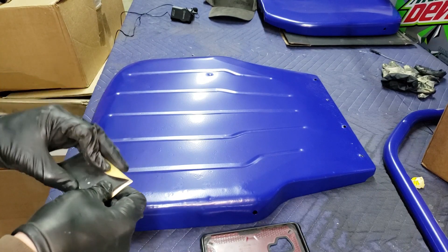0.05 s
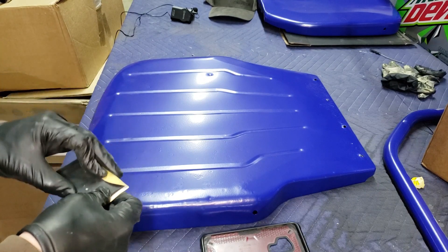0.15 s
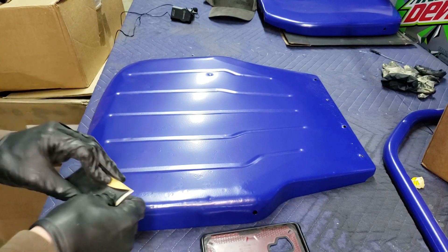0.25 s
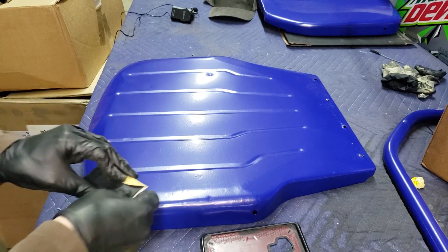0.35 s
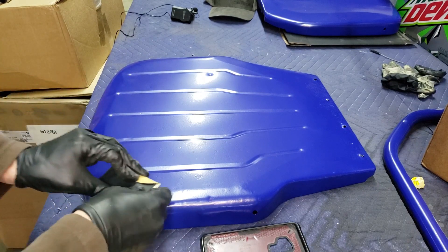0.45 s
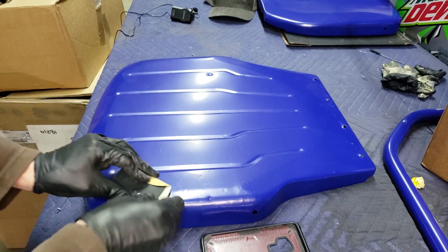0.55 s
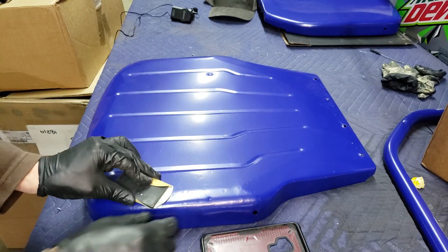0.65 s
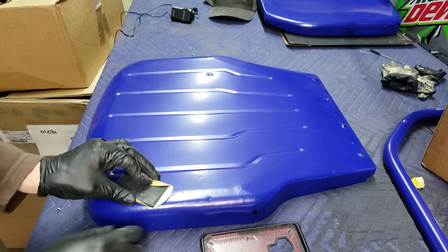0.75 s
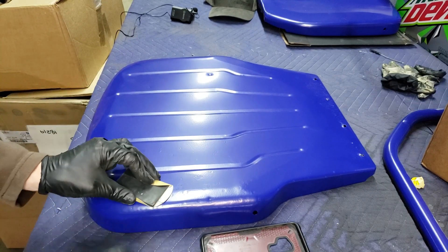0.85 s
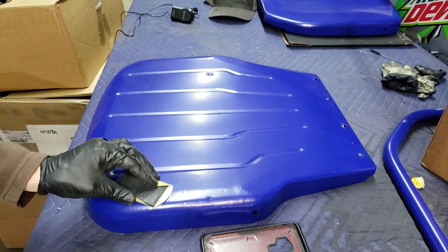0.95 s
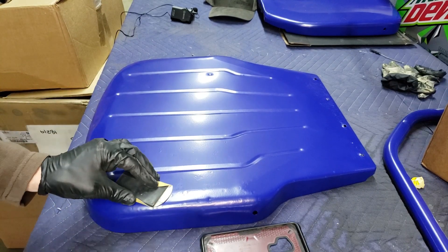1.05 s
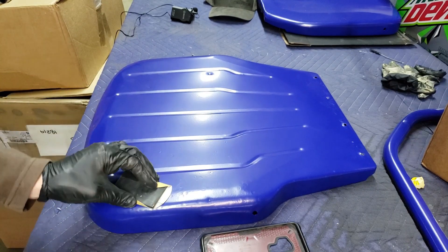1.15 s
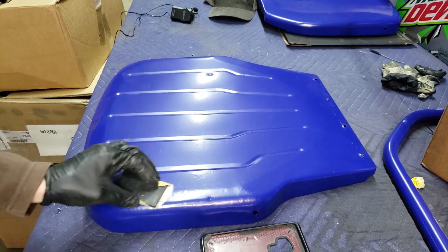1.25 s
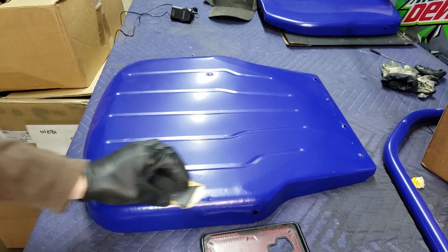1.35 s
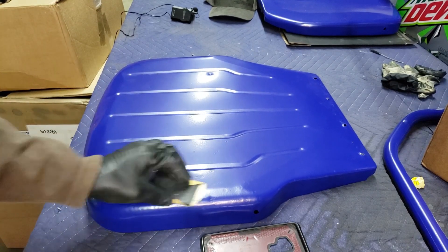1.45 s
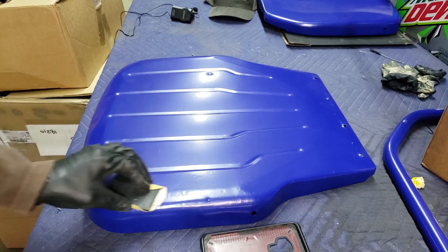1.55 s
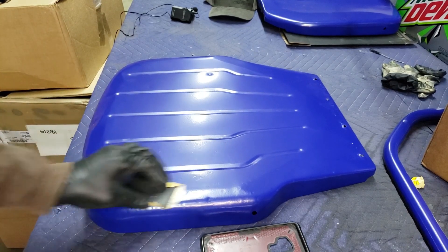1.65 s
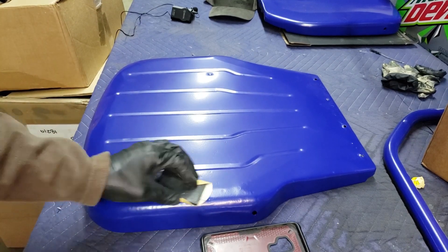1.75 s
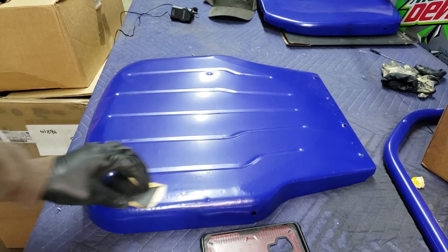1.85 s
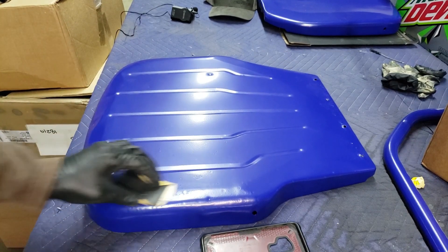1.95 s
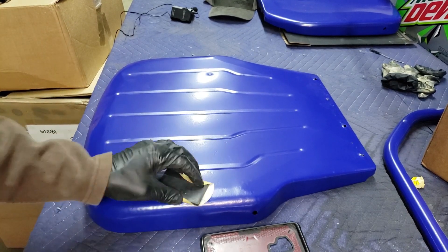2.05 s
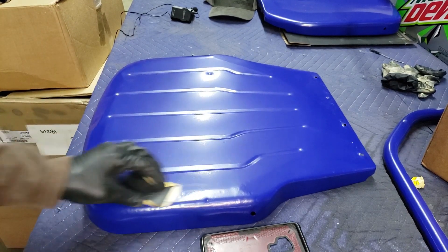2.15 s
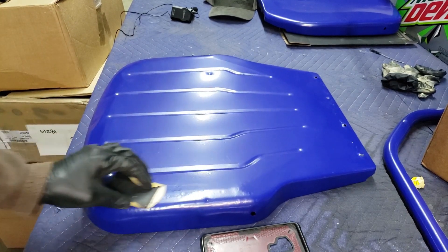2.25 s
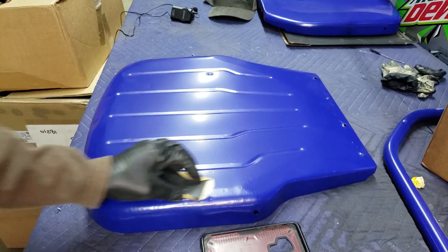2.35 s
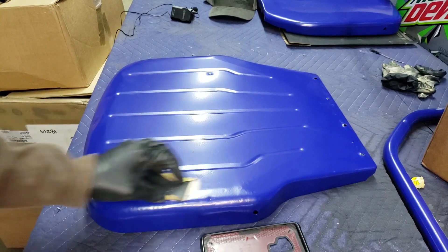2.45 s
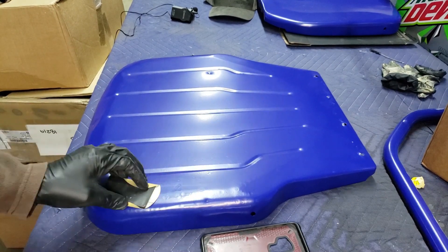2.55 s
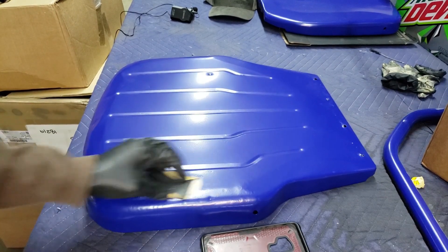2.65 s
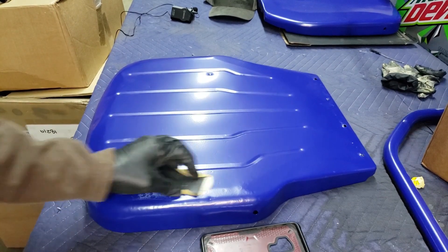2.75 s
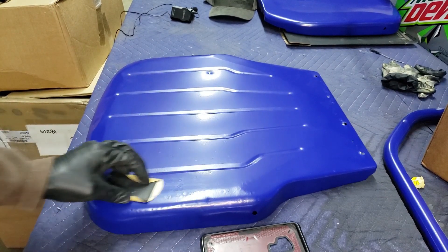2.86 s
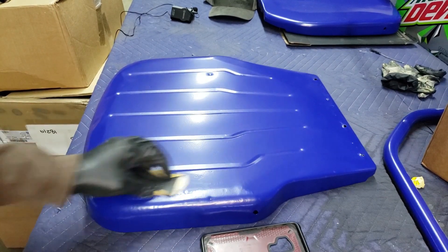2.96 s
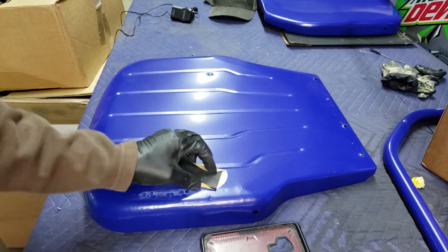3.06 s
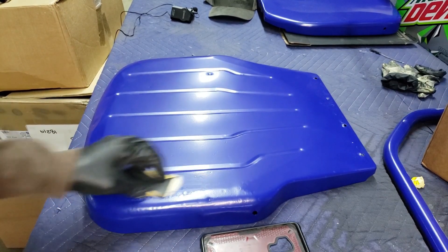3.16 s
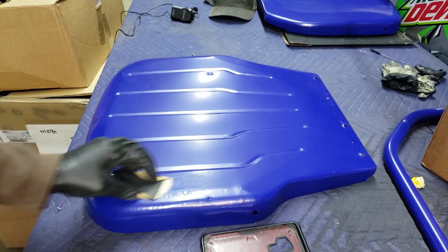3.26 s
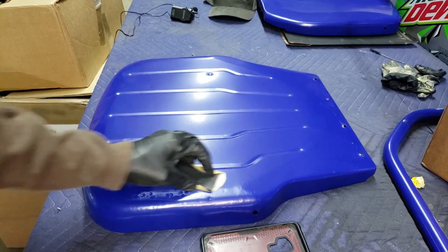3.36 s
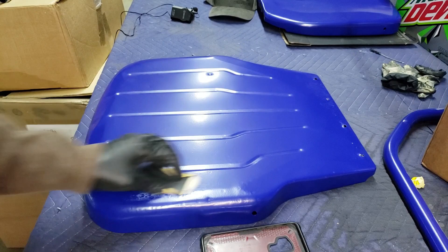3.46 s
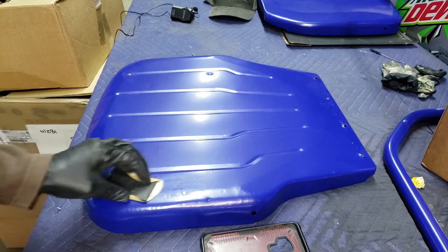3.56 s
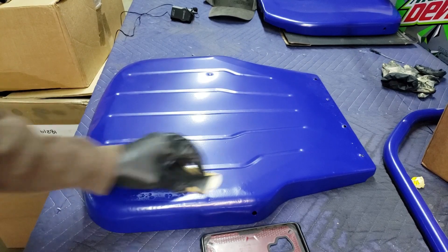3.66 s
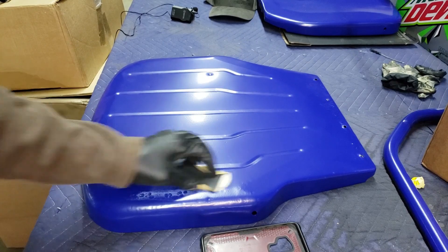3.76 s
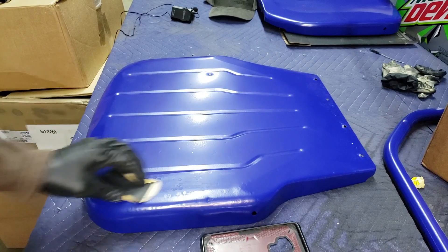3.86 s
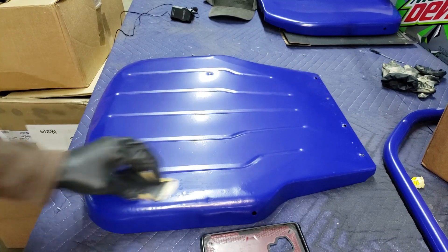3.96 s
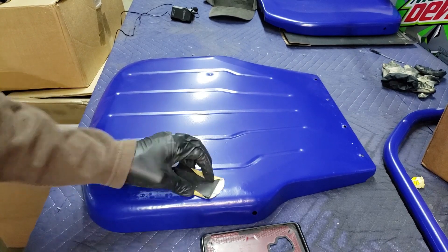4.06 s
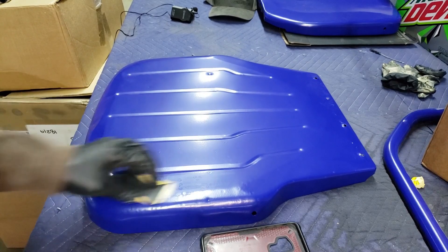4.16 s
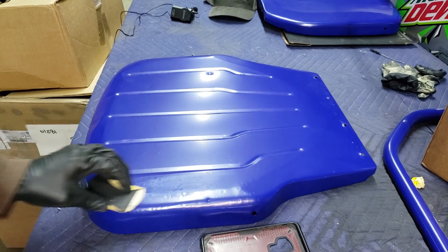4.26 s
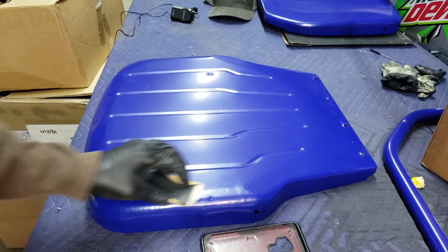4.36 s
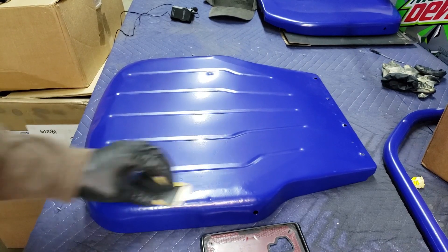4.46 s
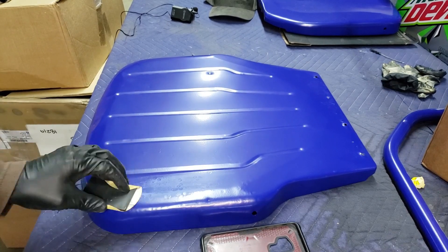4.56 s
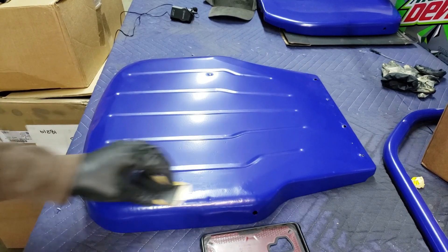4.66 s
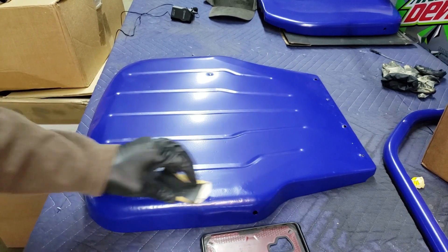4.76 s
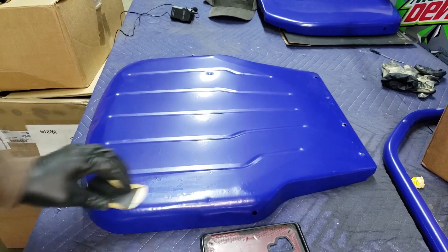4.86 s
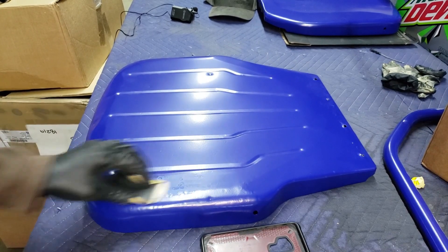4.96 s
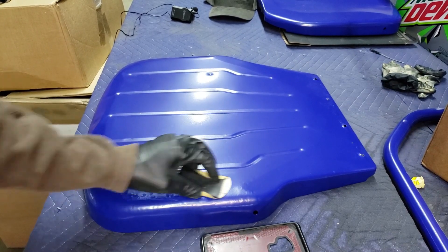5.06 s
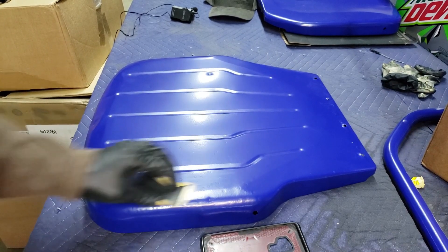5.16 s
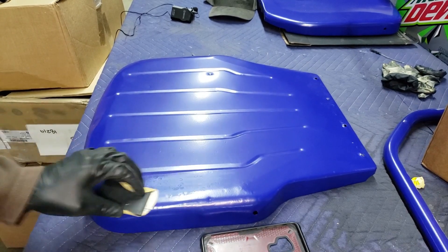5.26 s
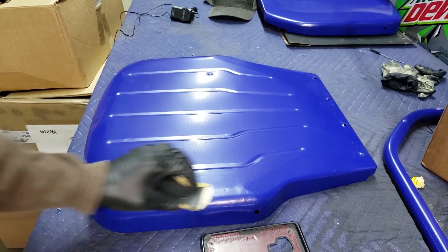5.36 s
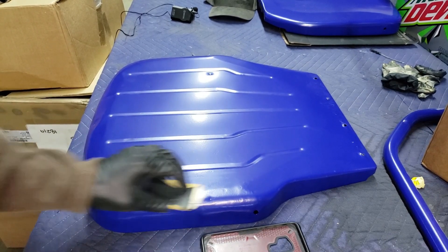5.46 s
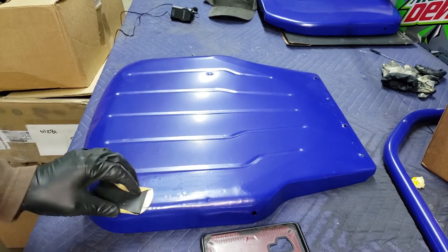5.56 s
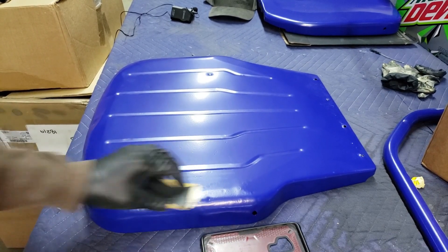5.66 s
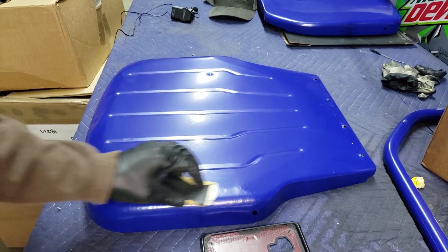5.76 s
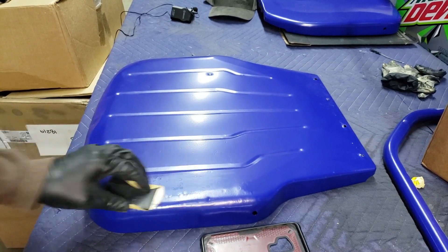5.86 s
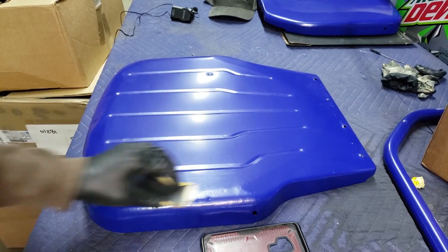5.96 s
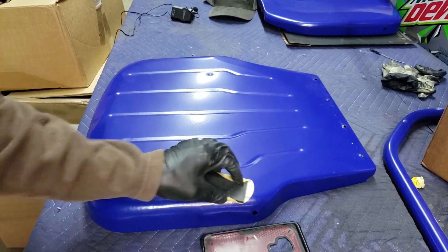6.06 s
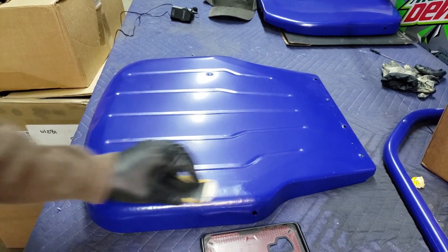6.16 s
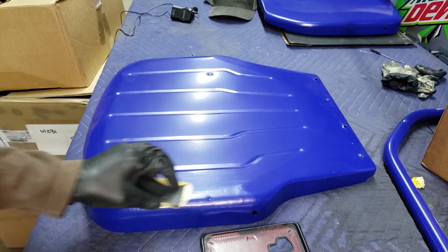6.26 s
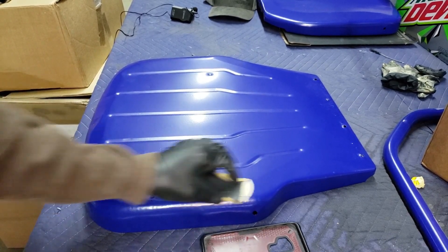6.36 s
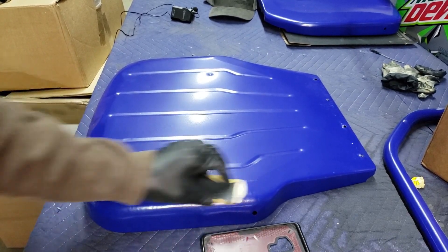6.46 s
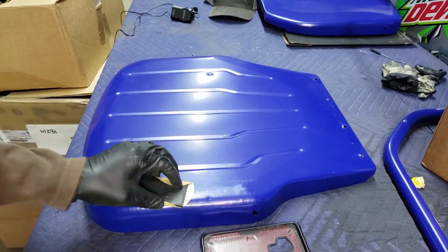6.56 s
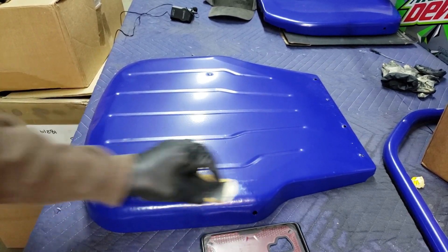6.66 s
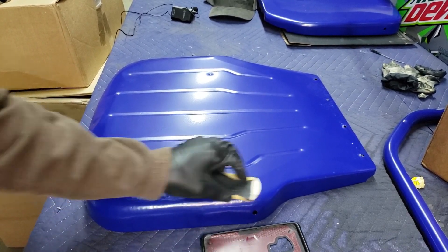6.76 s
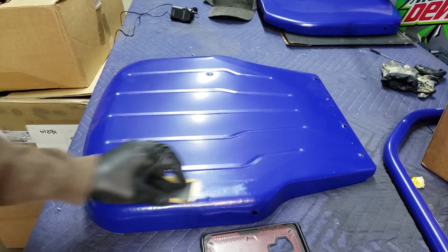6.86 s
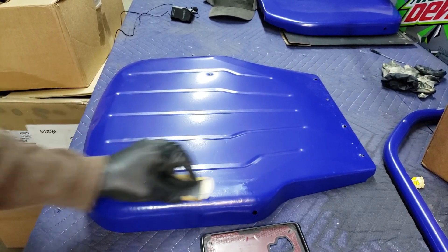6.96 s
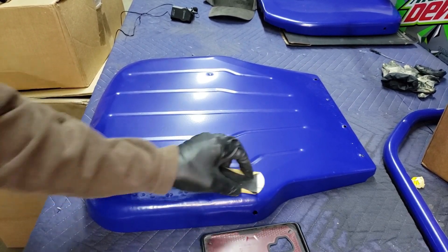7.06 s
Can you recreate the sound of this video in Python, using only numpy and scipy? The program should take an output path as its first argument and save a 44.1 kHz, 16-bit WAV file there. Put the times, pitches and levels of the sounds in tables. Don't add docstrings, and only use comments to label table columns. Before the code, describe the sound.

Gloved hands rustle and snap folded sandpaper, then rub it briskly back and forth on painted sheet steel in a humming workshop.

```python
import sys
import numpy as np
from scipy import signal
from scipy.fft import rfft, irfft
from scipy.io import wavfile
from scipy.ndimage import uniform_filter1d

SR = 44100
rng = np.random.default_rng(int(sys.argv[2]) if len(sys.argv) > 2 else 0)


def ratio_of_db(decibels):
    return 10 ** (np.asarray(decibels, float) / 20)


def materialize(psi):
    bounded = np.clip(np.atleast_2d(psi).T, -1, 1)
    quanta = np.round(bounded * 32767).astype(np.int16)
    wavfile.write(sys.argv[1], SR, quanta)


N = 313110


# [pad breaks free t/s, grit level/dB, fastest point 0-1, stuck at
# next turn t/s]
SANDING_STROKES = [(1.327, -40, 0.6, 0.042), (1.673, -38, 0.67, 0.034), (1.983, -38.0, 0.5, 0.026),
                   (2.311, -38.5, 0.55, 0.026), (2.643, -38, 0.8, 0.035), (2.97, -38.5, 0.35, 0.019),
                   (3.299, -39.5, 0.43, 0.017), (3.622, -38.5, 0.37, 0.022), (3.973, -38, 0.54, 0.02),
                   (4.315, -37, 0.64, 0.034), (4.641, -38.5, 0.52, 0.02), (4.974, -37.5, 0.42, 0.018),
                   (5.322, -40.5, 0.34, 0.018), (5.639, -38.5, 0.52, 0.021), (5.96, -38.5, 0.56, 0.025),
                   (6.309, -39, 0.66, 0.027), (6.643, -39.0, 0.6, 0.026), (6.978, -38, 0.2, 0.016),
                   (1.501, -39, 0.52, 0.033), (1.826, -37.5, 0.18, 0.026), (2.146, -38.5, 0.26, 0.029),
                (2.475, -37.0, 0.26, 0.03), (2.804, -38, 0.31, 0.022), (3.134, -40.5, 0.55, 0.022),
                (3.463, -40, 0.5, 0.023), (3.8, -39.5, 0.63, 0.021), (4.141, -36.5, 0.43, 0.032),
                (4.481, -37.5, 0.34, 0.032), (4.807, -37.5, 0.4, 0.026), (5.153, -37, 0.43, 0.025),
                (5.481, -37.5, 0.58, 0.025), (5.807, -39.0, 0.66, 0.029), (6.148, -38.5, 0.5, 0.027),
                (6.483, -40.5, 0.44, 0.023), (6.814, -36, 0.44, 0.027)]


def strokes():
    return np.transpose(sorted(SANDING_STROKES))


def hand(rise, fall, jolt, late_s, trail_s):
    last_turn_s = 7.16
    start, _, fastest, stuck = strokes()
    next_turn = np.r_[start[1:] + late_s, last_turn_s]
    start = start + late_s
    end = next_turn - stuck + trail_s
    t = np.arange(N) / SR
    k = np.clip(np.searchsorted(start, t) - 1, 0, len(start) - 1)
    way = np.clip((t - start[k]) / (end - start)[k], 0, 1)
    speeding = np.sin(np.pi / 2 * np.clip(way / fastest[k], 0, 1)) ** rise
    up = jolt + (1 - jolt) * speeding
    down = np.sin(np.pi / 2 * np.clip((1 - way) / (1 - fastest[k]), 0, 1)) ** fall
    return uniform_filter1d(up * down * (way > 0), size=260), k


# [f/Hz, left minus right level/dB]
GRIT_BALANCE = [(700, -1), (1300, 1.5), (2400, 2), (4400, 2), (6500, -1), (9000, 10), (12000, 2),
                (15000, 11)]


def sanding():
    tear = tearing()
    grit = paper_colour(tear)
    tips_speed, k = hand(0.5, 0.64, 0.27, 0.0016, 0.0084)
    sheet_speed, _ = hand(0.52, 0.68, 0.14, -0.006, 0.026)
    tips = tips_speed * patchy(grit, [8000, 10400, 14200, 18960], 1.0, 17) * ratio_of_db(6.5)
    strokes_sound = tips + pad(tear, grit, k) + panel(tear, grit, sheet_speed, k)
    grit_db = strokes()[1]
    work = ratio_of_db(grit_db[k]) * strokes_sound + flexing(sheet_speed) + chips()
    return irfft(rfft(work) * sides(on_log(GRIT_BALANCE, work)), N)


def tearing():
    luck = np.minimum(rng.exponential(size=N // 6 + 1), 4.5)
    size = np.repeat(ratio_of_db(1.6 * luck), 6)[:N]
    size = size * ratio_of_db(1.0 * walk(120) + 0.76 * walk(25))
    low = band(pair(0.33, lag=-6) * size, 100, 8200)
    high = band(pair(0.1, lag=-6) * size, 8200, 21000)
    return unit(low + high)


def effort():
    start, grit_db = strokes()[:2]
    usual_db = -39
    return start - start[0], grit_db - usual_db


def pad(tear, grit, k):
    worn_s, extra_db = effort()
    effort_share = 0.83
    level_db = (-5 - (1 - effort_share) * extra_db)[k]
    speed, _ = hand(1.0, 0.73, 0.42, 0.00033, 0.017)
    paper = patchy(grit, [4314, 4850, 6370, 7350, 8420], 1.83, 12) * ratio_of_db(5.0 + level_db)
    fold_db, fade_db_per_s = -6, 2.9
    fold = ring(tear, 6490, 780) * ratio_of_db(2.5 + level_db + fold_db - fade_db_per_s * worn_s[k])
    return speed * (paper + fold)


# [f/Hz, width f/Hz, level/dB]
PANEL_MODES = [(1136, 18, -12), (1250, 22, -8), (1465, 25, -6), (1781, 16, -4), (2013, 18, -6),
               (2186, 14, -2), (2318, 14, -9), (3035, 12, -1)]


def panel(tear, grit, speed, k):
    worn_s, extra_db = effort()
    effort_share, clog_db_per_s = 0.37, 0.5
    level_db = -8.5 - (1 - effort_share) * extra_db - clog_db_per_s * worn_s
    settle_db, settle_s = -2.5, 0.12
    level_db = level_db + settle_db * np.exp(-worn_s / settle_s)
    modes = sum(ratio_of_db(db + 2.5 * walk(8)) * ring(tear * speed, hz, width) for hz, width, db in PANEL_MODES)
    scrape = speed * patchy(grit, [800, 1500, 2300, 3300, 4500], 1.4, 16)
    return (scrape + ratio_of_db(-14) * unit(modes)) * ratio_of_db(3.0 + level_db[k])


def flexing(speed):
    return speed * unit(band(pair(0.89), 180, 824)) * ratio_of_db(-60.0 + 2 * walk(3.9))


# [t/s, peak level/dB]
LOOSE_GRAINS = [(1.527, -14), (1.568, -8), (1.7429, -16), (1.859, -8), (2.0546, -19), (2.0987, -15),
                (2.181, -6), (2.202, -2), (2.5556, -15), (2.7176, -28), (2.8734, -20), (3.3189, -19),
                (3.714, -21), (4.021, -2), (4.046, -18), (4.0615, -22), (4.2107, -4), (4.22, -6),
                (4.2327, -11), (4.355, -24), (4.3648, -17), (4.5144, -18), (4.8628, -11), (4.882, -2),
                (5.225, -8), (5.7309, -16), (5.85, 0), (6.0029, -15), (6.058, -18), (6.9127, -18)]


def chips():
    ticks = np.sign(pair(0.4, lag=-6)) * clicks(np.array(LOOSE_GRAINS), 0.0004) * ratio_of_db(-15.5)
    return paper_colour(band(ticks, 2400, 20000))


# [f/Hz, level/dB per Hz]
GRIT_SPECTRUM = [(900, -14.5), (1600, -8.5), (2200, -5.5), (3100, -2.5), (3500, -4), (5400, -1.5),
                 (6500, 0), (7500, -2), (8300, -11.5), (10000, -6), (12200, 1.5), (14000, -1.5), (15500, 0)]


def paper_colour(x):
    return colour(x, GRIT_SPECTRUM)


def handling():
    scuff = paper_colour(pair(0.32, lag=-4.5))
    lows = unit(band(scuff, 1400, 4340))
    mids = unit(band(scuff, 4300, 8900))
    tops = unit(band(scuff, 8000, 18000))
    return (rustling(lows, mids, tops) + snapping(mids, tops)) * sides(3.1)[:, None]


# [t/s, length t/s, level/dB, top minus rustle level/dB, lows minus rustle level/dB]
GLOVE_SCUFFS = [(0.0, 0.05, -78, -6, -3), (0.048, 0.09, -65.5, -5, -0.5), (0.225, 0.031, -64, -18, 2.5),
                (0.543, 0.06, -63, -12, 0), (0.579, 0.057, -56, -2, 0), (0.639, 0.066, -58, -2.5, 1.5),
                (0.704, 0.14, -67, -3, 3.5), (0.845, 0.016, -60, -3, -9), (0.855, 0.16, -73, -1, 4),
                (0.999, 0.022, -57, -4, -14), (1.011, 0.12, -62, -3, 6), (1.135, 0.074, -66.5, -16, 5),
                (1.19, 0.1, -58.5, -5.5, -0.5), (1.312, 0.03, -58, -2, -10)]


def rustling(lows, mids, tops):
    t = np.arange(N) / SR
    fastest, bluntness = 0.36, 0.65
    rustle = 0
    for start, length, db, top_db, low_db in GLOVE_SCUFFS:
        way = np.clip((t - start) / length, 0, 1)
        speed = np.minimum(way / fastest, (1 - way) / (1 - fastest))
        slide = np.sin(np.pi / 2 * speed) ** bluntness
        tone = mids + tops * ratio_of_db(top_db) + lows * ratio_of_db(low_db - 3.5)
        rustle = rustle + ratio_of_db(db) * slide * tone
    return rustle * ratio_of_db(2.0 * walk(150) + 1.1 * walk(500) + 3.5)


# [t/s, peak level/dB, mids minus peak level/dB]
CREASE_SNAPS = [(0.0897, -54, -4), (0.117, -49, 1), (0.2184, -57, -15), (0.2294, -57, -13),
                (0.5721, -54, -17), (0.6444, -41, -17), (0.66, -35, -7), (0.7374, -47, -14),
                (0.765, -45, -10), (0.7744, -43, -10), (0.7896, -42, -14), (0.8134, -32, -11),
                (0.848, -39, -16), (0.8889, -50, -10), (0.899, -46, -5), (0.9644, -48, -9),
                (1.006, -32, -12), (1.0154, -51, -11), (1.211, -39, -8), (1.2244, -45, -12),
                (1.2424, -44, -11), (1.2694, -51, -11)]


def snapping(mids, tops):
    snaps = np.array(CREASE_SNAPS)
    start, peak_db, mids_db = snaps.T
    bright = clicks(snaps, 0.0017) * np.sign(tops) * ratio_of_db(-9.5)
    dull = clicks(np.c_[start, peak_db + mids_db], 0.0022) * mids
    return bright + dull


def room(x):
    t60_s, level_db = 0.37, -9.5
    t = np.arange(SR // 2) / SR
    air = rng.standard_normal((2, len(t))) * (t > 0.004)
    low = band(air, 340, 4280) * ratio_of_db(-60 * t / t60_s)
    high = band(air, 3140, 25000) * ratio_of_db(-60 * t / (0.52 * t60_s))
    tail = unit(low + 0.45 * high) / np.sqrt(len(t))
    return ratio_of_db(level_db) * signal.fftconvolve(x, tail, axes=1)[:, :N]


# [f/Hz, level/dB, left minus right level/dB]
FAN_LINES = [(41.4, -57.5, 2), (82.8, -50.5, 1), (146.25, -48.5, -1)]


def fan():
    t = np.arange(N) / SR
    hum = 0
    for hz, db, pan_db in FAN_LINES:
        level = ratio_of_db(db + 1.5 + 0.11 * walk(3.7))
        line = np.sin(2 * np.pi * hz * t + 0.066 * walk(1.45))
        hum = hum + level * sides(pan_db)[:, None] * line
    return hum


# [f/Hz, width f/Hz, level/dB, left minus right level/dB]
DUCT_BOOMS = [(84.4, 13, -61.5, 3.5), (114.5, 8.3, -53.5, -4), (172.5, 7, -66, -18), (229.2, 30, -60, 2.5),
              (361.7, 17, -66, 8)]


def booms():
    out = 0
    for hz, width, db, pan_db in DUCT_BOOMS:
        boom = ring(ring(pair(1.0), hz, width), hz, width)
        out = out + ratio_of_db(db) * sides(pan_db)[:, None] * boom
    return out


# [f/Hz, width f/Hz, level/dB]
BLOWER_DUCT = [(240, 14, -5), (420, 100, -3), (520, 50, 1), (711, 10, 0), (766, 14, -11), (822, 10, -5.5),
               (1057, 40, -14)]


def blower():
    start_s, spin_up_s, level_db, gain_db_per_s = 5.56, 0.18, -55.5, 1.5
    on_s = np.maximum(np.arange(N) / SR - start_s, 0)
    flow = (1 - np.exp(-on_s / spin_up_s)) * ratio_of_db(level_db + gain_db_per_s * on_s + 1.0 * walk(14))
    rush = pair(0.49)
    duct = unit(sum(ratio_of_db(db) * ring(rush, hz, width) for hz, width, db in BLOWER_DUCT))
    return duct * flow * ratio_of_db(7.5)


# [f/Hz, likeness 0-1]
AIR_LIKENESS = [(60, .99), (250, .88), (500, .6), (1000, .05)]
# [f/Hz, level/dB per Hz]
AIR_SPECTRUM = [(20, -23), (32, -14.5), (62, -6), (150, -13.5), (300, -14.5), (530, -17), (620, -22.5),
                (1000, -24.5), (1700, -32.5), (2500, -34.5), (3300, -45), (6700, -37), (8600, -49.5),
                (15600, -46)]


def air_rush():
    mid, side = noise(2)
    alike = np.clip(on_log(AIR_LIKENESS, mid), 0, 1)
    mid = irfft(rfft(mid) * np.sqrt(1 + alike), N)
    side = irfft(rfft(side) * np.sqrt(1 - alike), N)
    air = unit(colour(np.array([mid + side, mid - side]), AIR_SPECTRUM)) * ratio_of_db(-49)
    return air * sides(2.6)[:, None]


def unit(x):
    return x / np.sqrt(np.mean(x ** 2))


def noise(*shape):
    return rng.standard_normal(shape + (N,))


def pair(alike, lag=0):
    shared = noise()
    alike = np.clip(alike, 0, 1)
    both = np.array([np.roll(shared, lag), shared])
    return np.sqrt(alike) * both + np.sqrt(1 - alike) * noise(2)


def walk(rate):
    k = int(SR / rate)
    held = np.repeat(rng.standard_normal(N // k + 1), k)
    return 1.29 * uniform_filter1d(held, k)[:N]


def clicks(rows, decay_s):
    hits = np.zeros(N)
    hits[(rows[:, 0] * SR).astype(int)] = ratio_of_db(rows[:, 1])
    return signal.lfilter([1], [1, -np.exp(-1 / (decay_s * SR))], hits)


def ring(x, hz, width):
    return unit(signal.lfilter(*signal.iirpeak(hz, hz / width, SR), x))


def bins_hz(x):
    return np.arange(x.shape[-1] // 2 + 1) * SR / x.shape[-1] + 1


def on_log(points, x):
    hz, value = np.transpose(points)
    return np.interp(np.log(bins_hz(x)), np.log(hz), value)


def colour(x, points):
    return irfft(rfft(x) * ratio_of_db(on_log(points, x)), x.shape[-1])


def band(x, lo_hz, hi_hz):
    octave = np.log2(bins_hz(x))

    def edge(hz):
        return np.clip((octave - np.log2(hz)) * 4 + 0.5, 0, 1)

    return irfft(rfft(x) * (edge(lo_hz) - edge(hi_hz)), x.shape[-1])


def patchy(x, edges_hz, patch_db, rate):
    bands = zip(edges_hz[:-1], edges_hz[1:])
    return unit(sum(ratio_of_db(patch_db * walk(rate)) * band(x, lo, hi) for lo, hi in bands))


def sides(pan_db):
    return ratio_of_db(np.array([pan_db, -pan_db]) / 2)


def scene():
    work = handling() + sanding()
    return work + room(work) + fan() + booms() + blower() + air_rush()


def roll_off(x):
    return signal.sosfilt(signal.butter(12, 17100, fs=SR, output="sos"), x)


def record(dry):
    rounded = np.tanh(3 * dry) / 3
    top_cut = signal.ellip(12, 0.3, 80, 15700, fs=SR, output="sos")
    mix = signal.sosfilt(top_cut, rounded)
    return roll_off(mix)


dry = scene()
out = record(dry)
materialize(out)
```